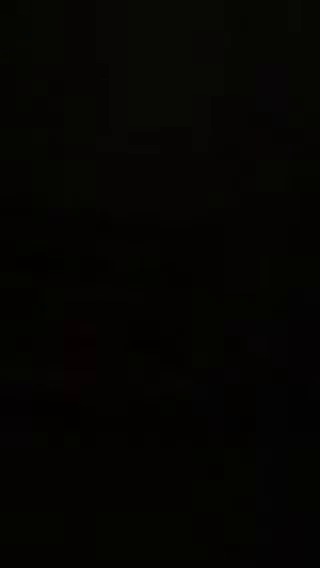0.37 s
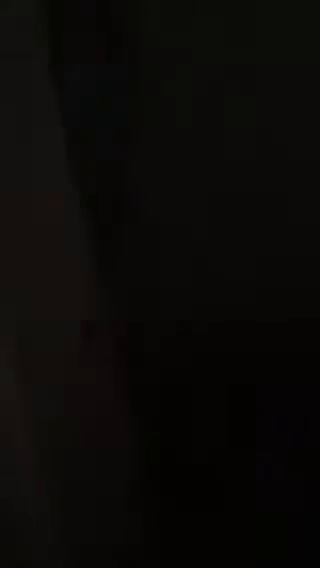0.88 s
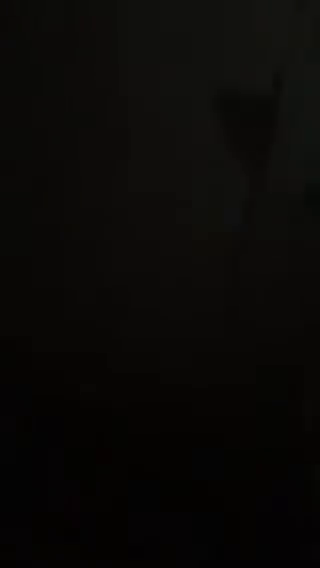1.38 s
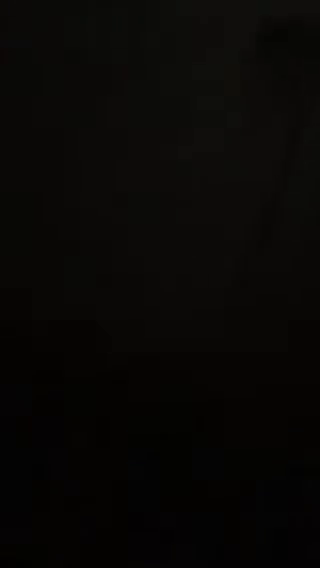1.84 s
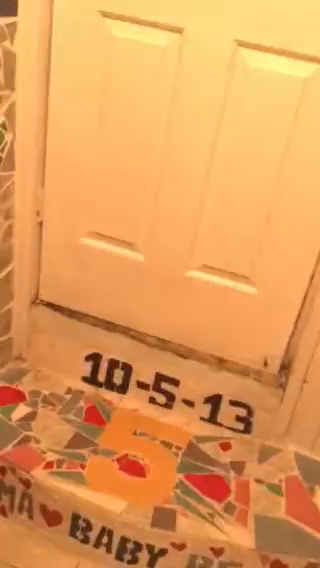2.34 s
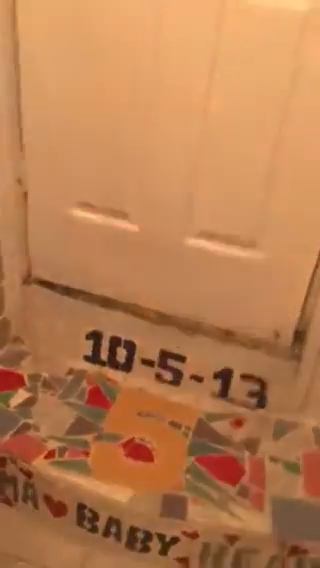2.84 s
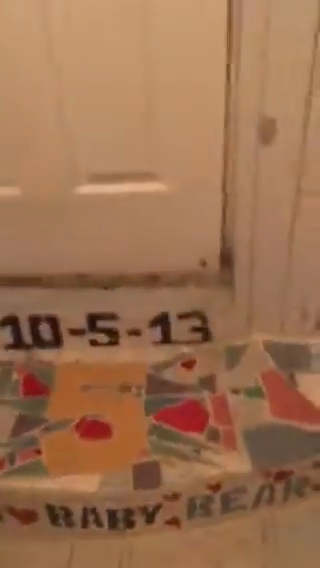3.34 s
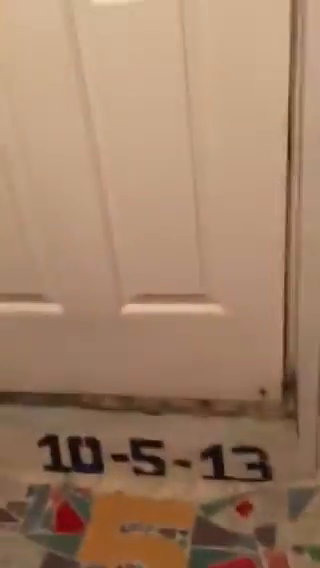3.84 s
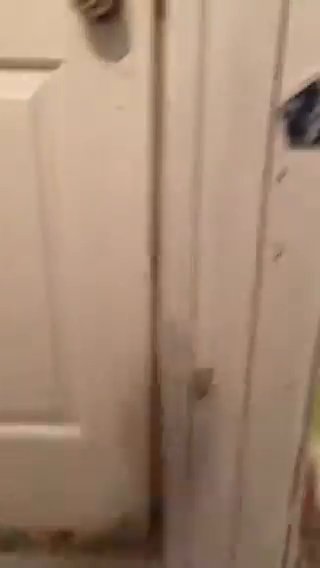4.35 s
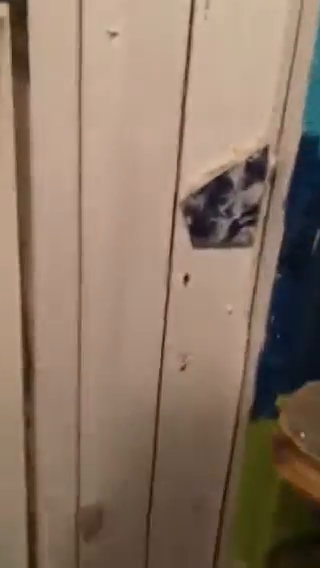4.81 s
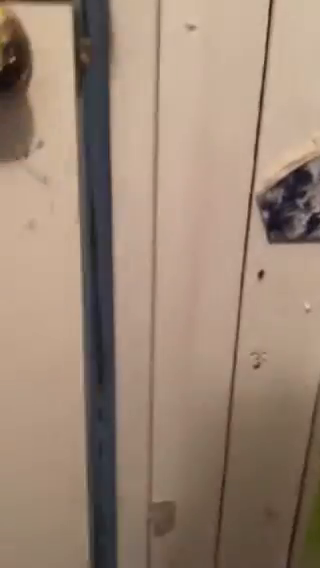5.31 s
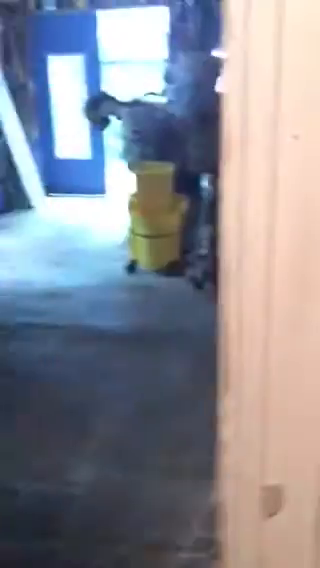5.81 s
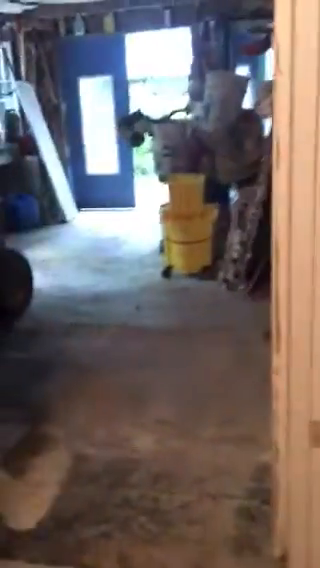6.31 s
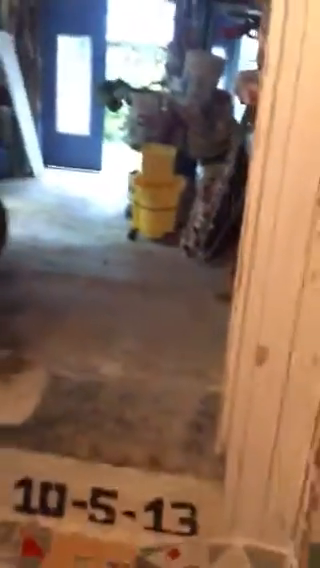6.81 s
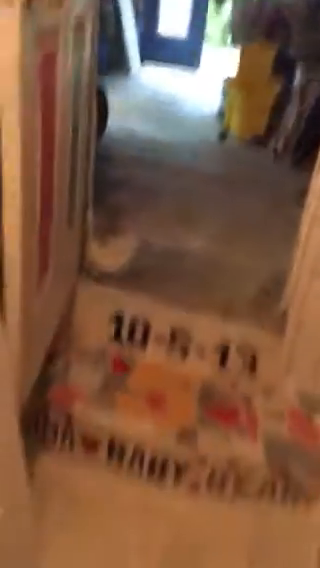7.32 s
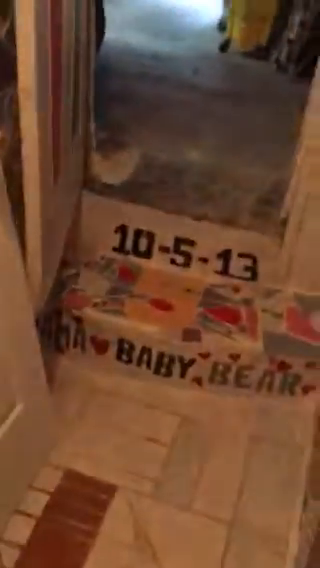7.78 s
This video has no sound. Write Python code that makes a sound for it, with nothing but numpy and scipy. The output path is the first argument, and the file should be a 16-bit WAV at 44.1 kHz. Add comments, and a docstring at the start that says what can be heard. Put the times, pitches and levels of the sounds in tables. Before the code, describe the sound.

A close handheld perspective in a hard, slightly echoing hallway, with quiet room noise, a low wavering hum and deep rumble throughout. From 0.2 to 0.9 s slippered soles scuff and slap, with a firmer knock near 0.5 s and gritty drags. From 1 to 2.8 s it is quieter: light scrapes, soft low thumps, a small tap at 1.35 s. Brighter slaps and scuffs return at about 3.0, 3.2, 3.6 and 4.3 s, with a short scrape at 4.9 s. At 5.05 s a sticking wooden door jerks loose: a loud bang, then a louder cluster at 5.13-5.18 s, panels ringing boomily as low rumble swells. It dies quickly; small dull knocks and rattles run from 5.5 to 6.0 s, strongest near 5.74 s. Until 8.1 s only faint shuffles, soft knocks and a light rub near 6.4 s remain.

```python
"""In a hallway, someone shuffles in slippers over a hard floor and pulls open a sticking panel door.
Soles slap and drag: blows ring the floor, and gritty noise swells and fades with each stroke.
The door jerks free of its frame with bangs and rattles on: many short blows ring its panels.
Echoes answer, while low wavering tones, steady room noise and a deep rumble lie underneath."""
import sys
import numpy as np
from scipy import signal
from scipy.fft import rfft, irfft, next_fast_len
from scipy.io import wavfile
from scipy.ndimage import uniform_filter1d

SR = 44100
rng = np.random.default_rng(int(sys.argv[2]) if len(sys.argv) > 2 else 0)


def field_ratio(decibels):
    """Amplitude ratio for a level in dB (20 dB per decade); scalars and array-likes work."""
    return 10 ** (np.asarray(decibels, dtype=float) / 20)


def to_wav(s):
    """Save 16-bit WAV."""
    ch = np.atleast_2d(s).T  # columns
    pcm = np.round(np.clip(ch, -1, 1) * 32767)  # PCM
    wavfile.write(sys.argv[1], SR, pcm.astype(np.int16))


N = 360297   # length of the scene in samples


def rms_one(x):
    """Scale a sound to an average (rms) strength of 1."""
    return x / np.sqrt(np.mean(x ** 2) + 1e-20)


def in_time(rows):
    """Draw straight lines between the timed rows and read each column at every sample."""
    s, *columns = np.transpose(rows)
    return [np.interp(np.arange(N) / SR, s, column) for column in columns]


def at_hz(points, hz):
    """Read a spectrum between its points, with frequency on a log scale."""
    points_hz, points_db = np.transpose(points)
    return np.interp(np.log(hz), np.log(points_hz), points_db)


def drift(rate_hz):
    """Random wandering of spread 1: noise smoothed twice, so that little is left above rate_hz."""
    hop = 40   # compute one value every 40 samples, then join them with lines
    r = np.exp(-2 * np.pi * rate_hz * hop / SR)
    white = rng.standard_normal(N // hop + 2002)
    slow = signal.lfilter([1], [1, -2 * r, r * r], white)[2000:]   # skip the start-up
    return np.interp(np.arange(N) / hop, np.arange(len(slow)), rms_one(slow))


def coloured(spectrum, white):
    """Shape white noise to a spectrum, then scale it to rms 1."""
    hz = np.maximum(np.fft.rfftfreq(N, 1 / SR), 1)
    return rms_one(irfft(rfft(white) * field_ratio(at_hz(spectrum, hz)), N))


def resonate(x, hz, t60):
    """One resonance: a unit click sets off a sine of height 1 that falls 60 dB in t60 seconds."""
    r = field_ratio(-60 / (t60 * SR))
    w = 2 * np.pi * hz / SR
    return signal.lfilter([0, np.sin(w)], [1, -2 * r * np.cos(w), r * r], x + 1e-18)


def struck(events, modes, tail, modes_db, tail_db, contact_s, t60, rattle_db, snap_db):
    """Each blow: rough contact rings the modes, the treble snaps, and scattered noise dies away."""
    # centres of the boom, thud, knock and crack regions [Hz]
    region_hz = [190, 550, 1800, 6500]
    snap_t60_s, rise_cycles = 0.014, 1.6   # a region builds up over a few of its own cycles
    out = np.zeros(N + SR)
    t = np.arange(SR // 2) / SR
    hz = np.maximum(np.fft.rfftfreq(len(t), 1 / SR), 1)
    shape = field_ratio(at_hz(tail, hz))
    distance = np.log(hz)[None] - np.log(region_hz)[:, None]
    share = np.exp(-(distance / 0.75) ** 2)
    share = share / share.sum(axis=0)   # the regions overlap smoothly
    for s, thud_db, boom_db, knock_db, crack_db in events:
        white = rng.standard_normal((4, len(t)))
        scatter_db = rng.normal(0, 2.5, len(modes))   # every blow excites the modes differently
        contact = 0.5 * rms_one(white[0] * np.exp(-t / contact_s)) / np.sqrt(len(t))
        contact[0] += 1   # a clean first touch, then chatter
        region_db = [boom_db, 0, knock_db, crack_db]
        colour = list(zip(region_hz, region_db))
        sound = 0
        for (f, db, ring_s), more_db in zip(modes, scatter_db):
            sound = sound + field_ratio(modes_db + db + more_db + at_hz(colour, f)) * resonate(contact, f, ring_s)
        # loose parts make the tail uneven, more so after the first few milliseconds
        wobble = rms_one(uniform_filter1d(white[2], size=200))
        rattle = field_ratio(rattle_db * np.tanh(wobble * t / 0.008))
        # every spot has small resonances of its own
        grain = field_ratio(3.5 * np.interp(60 * np.log(hz), np.arange(1000), white[3, :1000]))
        for k, db in enumerate(region_db):
            band = rms_one(irfft(rfft(white[1]) * shape * grain * share[k], len(t)))
            fade = field_ratio(tail_db + db - 60 * t / t60)
            snap = (k > 1) * field_ratio(snap_db - 60 * t / snap_t60_s)   # in knock and crack only
            rise = np.minimum(t * region_hz[k] / rise_cycles, 1)
            sound = sound + fade * band * (rattle + snap) * rise
        i = round(s * SR)
        out[i:i + len(t)] += field_ratio(thud_db) * sound * np.minimum(t / 0.00045, 1)
    return signal.sosfilt(signal.butter(2, 60, "high", fs=SR, output="sos"), out[:N])


def door():
    """Latch and frame strike the door, whose panels ring and scatter noise."""
    # the blows: (time [s], thud level [dB], then boom, knock and crack re thud [dB])
    blows = [(4.992, -32.5, -1.5, -8.5, -24.5), (5.026, -36, 1, 0, -11), (5.051, -14.5, -9.5, -1.5, -4.5),
             (5.089, -19.5, -4.5, -8.5, -6.5), (5.125, -22.5, -3.5, 7.5, 7.5), (5.137, -11.5, -5, -1, 4.5),
             (5.152, -9.5, -4.5, -4, 1), (5.184, -18, -1, 1.5, -4), (5.249, -29.5, 4, 3.5, 1.5),
             (5.389, -44.5, 11.5, -4, -15), (5.468, -35.5, -14.5, -5.5, -24),
             (5.495, -28.5, -25, -15, -30.5), (5.722, -41, -20, -22.5, -30), (5.738, -23, -26, -23, -34),
             (5.761, -28.5, -20, -3.5, -12), (5.798, -39, -7, -16, -20), (5.841, -31.5, -12, -21, -28),
             (5.859, -34.5, -30, -7, -24), (5.91, -34, -9, -28, -26.5), (5.935, -35.5, -21, -23, -26.5),
             (5.984, -36, -13, -35, -48.5), (6.006, -41, -16, -28, -45)]
    # ringing of the door: (frequency [Hz], relative level [dB], time to fall 60 dB [s])
    modes = [(149.6, 1.5, 0.34), (213.4, -7.5, 0.53), (253.4, -5, 0.23), (350, 0.5, 0.22),
             (398, -11.5, 0.17), (625, -10.5, 0.25), (915, -14, .1), (1156, -8, 0.1), (2344, -5.5, 0.25),
             (6180, -5.5, 0.022)]
    # colour of the scattered noise: (frequency [Hz], relative level [dB])
    tail = [(60, -35.5), (90, -15), (150, 2), (350, -9), (600, -15), (1100, -14.5), (1700, -16),
            (2450, -13), (3200, -20), (4900, -25), (6500, -25.5), (8000, -31), (16000, -47.5)]
    return struck(blows, modes, tail, modes_db=-7.0, tail_db=-10, contact_s=0.0067, t60=0.24,
                  rattle_db=1.0, snap_db=1.0)


def steps():
    """Soles and small knocks strike the floor, which rings briefly and scatters noise."""
    # the hits: (time [s], thud level [dB], then boom, knock and crack re thud [dB])
    hits = [(0.499, -34.5, -7, -8.5, -33), (0.539, -23.5, -20, -50, -17), (0.698, -30, -16, -23, -24),
            (1.045, -49, 4, 5.5, -2), (1.205, -48, 12.5, -1, 7), (1.347, -37.5, 2, -18, -20),
            (1.644, -53.5, 19, -8, 2), (2.176, -48, 8, 12, 3), (2.487, -65, -9, -1, 22.5),
            (2.954, -33.5, -9, -3.5, -2.5), (3.138, -36.5, 2, 2, -10), (3.234, -56.5, -19, 8.5, 30.5),
            (3.553, -36, -24, -3, -15), (3.597, -33.5, -1, -8, -22), (4.032, -47.5, 16, -2, -3),
            (4.271, -26.5, -11, -2, -3), (4.493, -44.5, 15.5, 12.5, -23), (6.393, -49, 12, 8.5, 5.5),
            (6.598, -40.5, -15, -11, -18), (7.108, -52.5, 12.5, 7.5, -13), (7.305, -38.5, -16, -12, -24.5),
            (7.783, -52, -13.5, -6.5, -9.5)]
    # ringing of the floor: (frequency [Hz], relative level [dB], time to fall 60 dB [s])
    modes = [(261.2, -2, 0.192), (400, -16, 0.074), (503, 5, 0.032), (620, -4.5, 0.2), (950, -22, 0.037),
             (1610, -14, 0.048), (2200, 2, 0.027)]
    # colour of the scattered noise: (frequency [Hz], relative level [dB])
    tail = [(150, 11), (300, 15.5), (600, 8), (1500, -7.5), (3000, -22), (6000, -38.5), (16000, -56.5)]
    return struck(hits, modes, tail, modes_db=-11.5, tail_db=-10.5, contact_s=0.00544, t60=0.17,
                  rattle_db=-0.5, snap_db=-8.0)


def dragging():
    """Sole on gritty floor: a bright hiss and duller rasp go from touch to lift, then fall away."""
    # one row a stroke: (touch time [s], length [s], hiss level at touch [dB], hiss level at lift [dB],
    # rasp level at lift [dB])
    strokes = [(0.0, 0.058, -85.5, -63.5, -60), (.2, 0.1, -70, -41.5, -49), (.499, 0.13, -60.5, -53, -52),
               (.68, 0.12, -61.5, -45, -47), (.86, 0.16, -64, -54.5, -54.5), (1.1, 0.24, -64, -62, -62),
               (1.35, 0.12, -53, -52, -53), (1.58, 0.073, -82, -58.5, -54.5), (1.8, .35, -69.5, -65, -61.5),
               (2.181, .06, -61, -70, -56), (2.355, 0.045, -71, -72, -70), (2.46, .07, -78, -66, -62.5),
               (2.55, 0.052, -69, -54, -75), (2.957, .13, -54, -48.5, -52), (3.12, 0.075, -55, -66, -59.5),
               (3.235, 0.031, -42.5, -48, -55), (3.334, 0.059, -55, -54, -59.5),
               (3.55, 0.14, -50.5, -46, -49), (3.717, 0.037, -56, -41, -50.5),
               (3.96, 0.057, -72, -53, -59.5), (4.273, .17, -48, -49.5, -52.5), (4.52, 0.11, -66, -70, -69),
               (4.65, 0.095, -71, -52.5, -66.5), (4.879, 0.043, -56.5, -41.5, -49.5),
               (5.02, .34, -52, -61, -53), (5.464, 0.041, -62, -77, -59), (5.6, 0.071, -67.5, -59.5, -60),
               (5.7, 0.04, -74, -57, -53), (5.82, 0.084, -56.5, -58.5, -58), (5.95, 0.063, -69, -63, -65),
               (6.06, 0.12, -65.5, -59.5, -55), (6.322, 0.099, -54.5, -62, -68.5),
               (6.45, 0.091, -77, -55, -53.5), (6.6, 0.076, -62, -67.5, -64.5),
               (7.12, 0.096, -63.5, -70, -64.5), (7.385, 0.15, -69, -59.5, -65.5),
               (7.76, .05, -82, -64, -59.5), (7.92, .17, -76, -64.5, -61.5)]
    # colour of the bright hiss: (frequency [Hz], relative level [dB])
    hiss_colour = [(1470, -11), (2500, -7), (9150, -6), (13000, -12), (16000, -22.5)]
    # colour of the duller rasp: (frequency [Hz], relative level [dB])
    rasp_colour = [(180, -29), (300, -2), (630, -3.5), (1220, -5), (3230, -6.5), (5000, -8.5),
                   (6500, -14.5), (11000, -120)]
    swell_power, rasp_follows = 0.5, 0.97   # curve from touch to lift; share of it the rasp follows
    hiss_fall_db_per_s, rasp_fall_db_per_s = 227, 138.5   # after the lift
    linger_db, linger_fall_db_per_s = -21, 69.5   # a faint hiss lingers behind each stroke
    t = np.arange(N) / SR
    hiss_power, rasp_power = np.zeros((2, N))
    for s, length_s, touch_db, lift_db, rasp_db in strokes:
        i = round(s * SR)
        length_s = max(length_s, 0.001)
        since = t[:min(N - i, SR)]
        swell_db = (touch_db - lift_db) * (1 - np.minimum(since / length_s, 1) ** swell_power)
        after = np.maximum(since - length_s, 0)
        linger = (after > 0) * field_ratio(lift_db + linger_db - linger_fall_db_per_s * after) ** 2
        hiss_power[i:i + SR] += field_ratio(lift_db + swell_db - hiss_fall_db_per_s * after) ** 2 + linger
        rasp_power[i:i + SR] += field_ratio(rasp_db + rasp_follows * swell_db - rasp_fall_db_per_s * after) ** 2
    # dense noise with some grains much stronger than others
    grit = rng.standard_normal((2, N)) * field_ratio(2.0 * np.minimum(rng.exponential(1, (2, N)), 4))
    hiss = coloured(hiss_colour, grit[0]) * field_ratio(1.0 * drift(40))
    rasp = coloured(rasp_colour, grit[1]) * field_ratio(1.3 * drift(21))
    return np.sqrt(hiss_power) * hiss + np.sqrt(rasp_power) * rasp


def rubs():
    """Friction noise through one resonance, swelling fast, catching unevenly and fading."""
    # (time [s], length [s], frequency [Hz], width of each filter [Hz], level before shaping [dB])
    rub_rows = [(0.562, 0.14, 540, 250, -52), (0.703, 0.23, 597, 350, -49), (0.719, 0.15, 2800, 1500, -48),
                (0.913, 0.19, 574, 300, -57), (1.841, 0.33, 2200, 450, -65), (2.176, 0.15, 1710, 900, -57),
                (2.975, 0.17, 3330, 1000, -47), (3.603, 0.19, 3140, 1210, -48.5),
                (4.29, 0.1, 2780, 1200, -48), (6.4, 0.41, 2170, 300, -62), (7.802, .16, 3270, 300, -65),
                (8.041, 0.073, 3130, 300, -64)]
    out = np.zeros(N + SR)
    for s, length_s, hz, width_hz, db in rub_rows:
        part = np.linspace(0, 1, round(length_s * SR))
        noise = rng.standard_normal(SR)
        t60 = np.log(1000) / (np.pi * width_hz)   # a wider resonance dies sooner
        band = rms_one(resonate(resonate(noise, hz, t60), hz, t60))[:len(part)]
        catching = field_ratio(db + 2.05 * drift(13.6)[:len(part)])
        i = round(s * SR)
        out[i:i + len(part)] += catching * band * np.sin(np.pi * part ** 0.54)
    return out[:N]


def thumps():
    """Weight on the boards: a sudden push sets one low floor mode ringing."""
    # (time [s], level [dB], frequency [Hz], time to fall 60 dB [s])
    pushes = [(1.028, -33.5, 56.5, 0.047), (1.214, -35, 65, 0.047), (2.077, -41, 138, 0.27),
              (6.505, -39.5, 103.6, 0.29)]
    out = np.zeros(N)
    for s, level_db, hz, t60 in pushes:
        push = np.zeros(N)
        push[round(s * SR)] = field_ratio(level_db)
        out += resonate(push, hz, t60)
    return out


def hallway(x, t60=0.45, wall_hz=3000):
    """Echoes from ten feedback delays; the walls take treble above wall_hz on every round."""
    size = next_fast_len(N + SR)
    w = 2 * np.pi * np.fft.rfftfreq(size)
    wall = 1 / (1 + 1j * w * SR / (2 * np.pi * wall_hz))
    echo = 0
    for k, lag in enumerate(rng.uniform(0.012, 0.04, 10) * SR):   # delays in samples
        loop = field_ratio(-60 * lag / SR / t60) * wall * np.exp(-1j * w * lag)
        echo = echo + (-1) ** k * loop / (1 - loop)   # all rounds of this delay added up
    return irfft(rfft(x, size) * echo, size)[:N]


def hum():
    """House hum: tones that waver in level and phase; the open door changes their balance."""
    # (frequency [Hz], level with door shut [dB], level with door open [dB], wavering [dB])
    tones = [(119.7, -57.5, -60.5, 1.5), (199.4, -66, -69.5, 3.5), (363, -75.5, -74, 4),
             (71.8, -71.5, -55.5, 3), (587, -79, -76, 4.5), (1280, -101, -76, 3)]
    # how far the door is open: (time [s], opening [0-1])
    opening = [(0, 0.16), (5.2, 0), (5.7, 0.8), (8.17, 1)]
    opened, = in_time(opening)
    t, out = np.arange(N) / SR, 0
    for hz, shut_db, open_db, waver_db in tones:
        level = field_ratio(shut_db + opened * (open_db - shut_db) + waver_db * drift(30))
        out = out + np.sqrt(2) * level * np.sin(2 * np.pi * hz * t + 2.7 * drift(2.2))
    return out


def air():
    """Steady room noise, and a deep noise rumble that swells when the door bangs."""
    # colour of the room noise: (frequency [Hz], relative level [dB])
    room_colour = [(15, -51.5), (25, 5.5), (53, -19.5), (130, 1.5), (463, -14.5), (2220, -23),
                   (5000, -30.5), (6050, -27.5), (11900, -63.5), (16000, -51)]
    # the deep rumble: (time [s], level [dB])
    rumble = [(0, -58), (2.8, -63), (4.9, -53.5), (5.15, -37), (5.45, -49.5), (6.5, -59), (8.17, -58)]
    rumble_colour = [(25, -24.5), (45, -3.5), (72, 4.5), (95, -15.0), (130, -41.0)]   # ([Hz], [dB])
    rumble_db, = in_time(rumble)
    low = coloured(rumble_colour, rng.standard_normal(N))
    room = coloured(room_colour, rng.standard_normal(N))
    return field_ratio(-59) * room + field_ratio(rumble_db) * low


def scene():
    """Hits and friction sound in the hallway; thumps, hum and air are added without echo."""
    hits = door() + steps()
    friction = dragging() + rubs()
    echoes = field_ratio(-19.5) * hallway(hits + 0.52 * friction)
    return (hits + echoes + thumps() + friction + hum() + air())[None]


def roll_off(x):
    """The treble ends steeply here."""
    return signal.sosfilt(signal.butter(12, 16390, fs=SR, output="sos"), x)


def record(dry):
    """The microphone housing cuts two dips in the treble, then peaks are softly rounded."""
    # dips of the housing: (frequency [Hz], width [Hz], depth [dB])
    notches = [(4950, 185, -4), (10340, 370, -4)]
    hz = np.fft.rfftfreq(N, 1 / SR)
    dips_db = sum(db * np.exp(-((hz - centre_hz) / width_hz) ** 2) for centre_hz, width_hz, db in notches)
    dipped = irfft(rfft(dry) * field_ratio(dips_db), N)
    rounded = 0.94 * np.tanh(dipped / 0.96)
    return roll_off(rounded)


dry = scene()
out = record(dry)
to_wav(out)
```